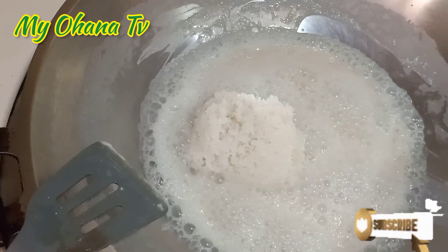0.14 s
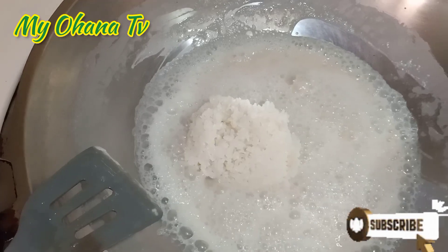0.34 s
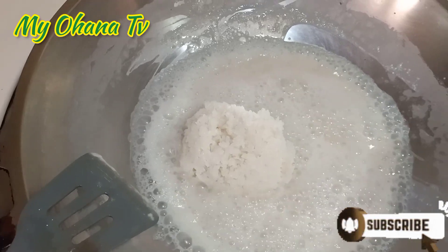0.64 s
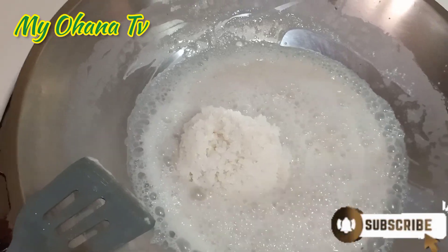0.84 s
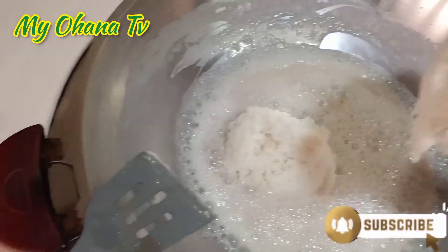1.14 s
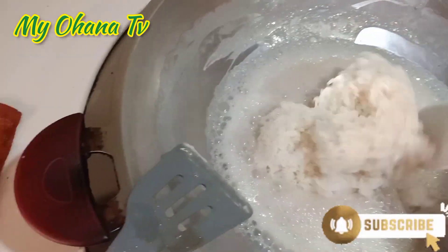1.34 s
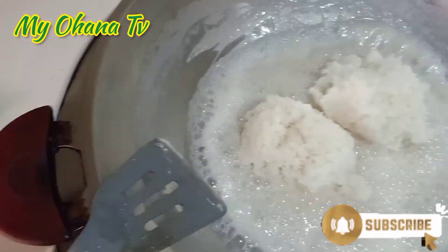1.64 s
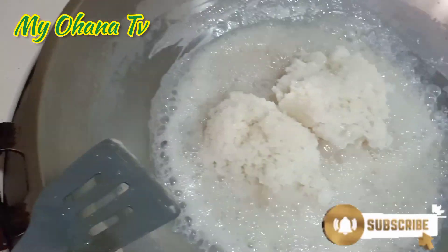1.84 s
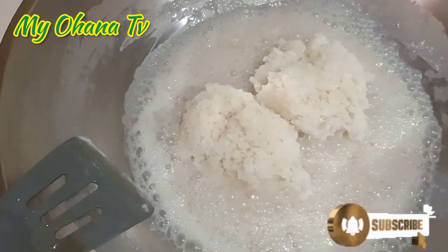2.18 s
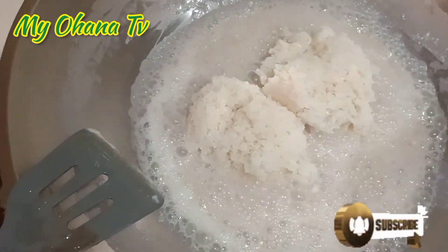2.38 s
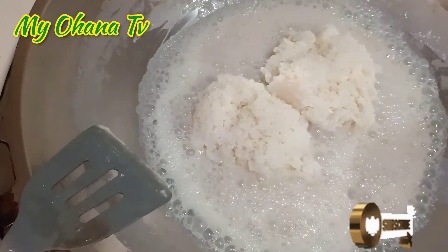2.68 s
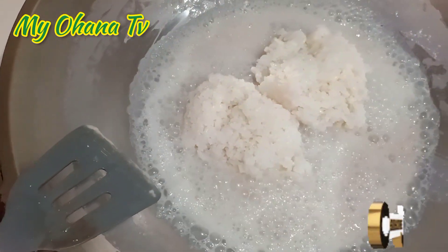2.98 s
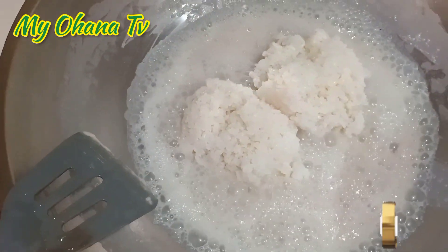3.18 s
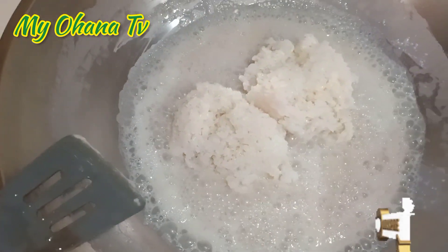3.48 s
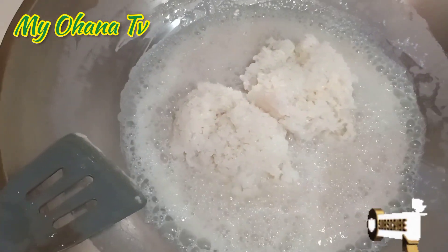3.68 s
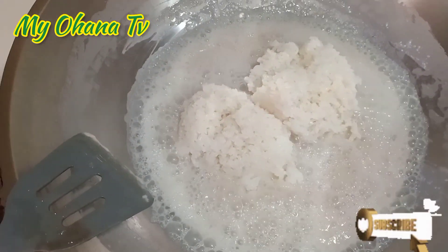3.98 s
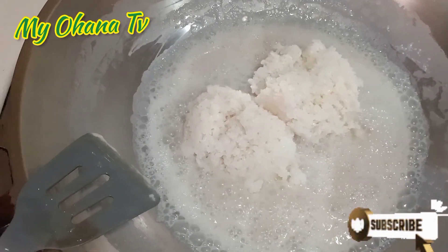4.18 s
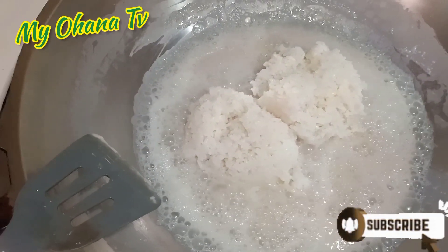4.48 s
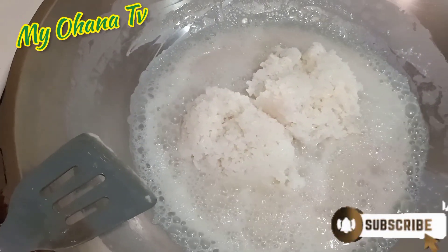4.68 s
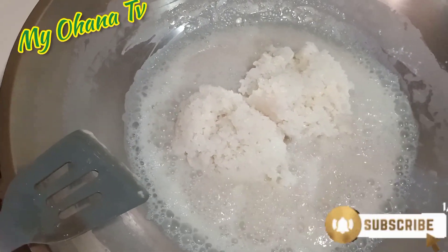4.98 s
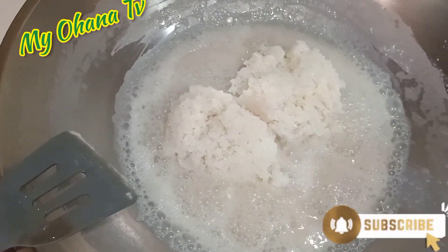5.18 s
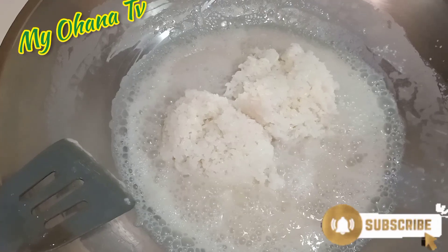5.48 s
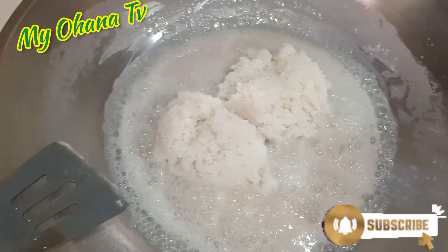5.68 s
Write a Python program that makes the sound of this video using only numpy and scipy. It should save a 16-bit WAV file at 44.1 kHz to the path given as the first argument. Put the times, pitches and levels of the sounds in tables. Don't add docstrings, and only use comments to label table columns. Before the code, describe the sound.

Thick milk boils throughout in a wide steel pan, heard close in stereo and leaning left. Dense rounded blips around 1 kHz ring in the pan's hollow, with fine hissing foam, small crackles and a low unsteady rumble. At about 0.43 s a paddle knocks hard on a full pot, a woody thud with a sharp crack and quick bounces. From 1.3 to 2.5 s rice lumps slide in: soft gritty sloshes, a sudden plop near 1.8 and fading wet washes. Another strong bouncing knock lands at 2.7 s. Around 3.25 s there is a very short scratchy scrape with ticks on the steel rim. A dull double knock comes at 4.0 s, then a light scrape and bright, quickly damped clank at 4.5 s. The small kitchen adds a short diffuse tail. Bubbles become slightly higher in pitch, while foam thins and the boil quietens towards 5.8 s.

```python
import sys
import numpy as np
from scipy import signal
from scipy.fft import rfft, irfft, next_fast_len
from scipy.io import wavfile
from scipy.ndimage import uniform_filter1d, map_coordinates

SR = 44100
rng = np.random.default_rng(int(sys.argv[2]) if len(sys.argv) > 2 else 0)


def transcribe(signal):
    frames = np.atleast_2d(signal).T
    limited = np.clip(frames, -1, 1)
    pcm = np.round(limited * 32767).astype(np.int16)
    wavfile.write(sys.argv[1], SR, pcm)


def rack_gain(trim_db):
    fader = np.asarray(trim_db, float)
    return 10 ** (fader / 20)


N = 256970
TIME_S = np.arange(N) / SR


def unit(x):
    return x / np.sqrt(np.mean(x ** 2) + 1e-20)


def along(points, hz):
    f, v = np.transpose(points)
    return np.interp(np.log(hz + 1), np.log(f + 1), v)


def over_time(rows):
    s, value = np.transpose(rows)
    return np.interp(TIME_S, s, value)


def wobble(rate):
    knots = rng.standard_normal(int(N * rate / SR) + 4)
    return map_coordinates(knots, [np.arange(N) * rate / SR])


def filtered(x, response):
    m = next_fast_len(N + SR // 2)
    return irfft(rfft(x, m) * response(np.fft.rfftfreq(m, 1 / SR)), m)[..., :N]


def resonances(peaks, direct_db):
    return lambda f: rack_gain(direct_db) + sum(
        rack_gain(db) * 1j * f * w / (c * c - f * f + 1j * f * w) for c, w, db in peaks)


def sides(pan_db):
    return rack_gain(np.multiply.outer([.5, -.5], pan_db))


def swell(peak_s, db, rise_s, t60):
    t = TIME_S - peak_s
    return rack_gain(db - 60 * np.where(t < 0, -t / rise_s, t / t60))


def place(events, shape):
    out = np.zeros((2, N + SR))
    for s, *rest in events:
        wave = shape(*rest)
        out[:, round(s * SR):][:, :wave.shape[1]] += wave
    return out[:, :N]


# frequency in Hz, left-right likeness from 0 to 1.
COHERENCE = [(60, 1), (180, 0.95), (550, 0.75), (1650, 0.4), (4970, 0.04), (15000, 0.02)]
# frequency in Hz, left-right level in dB.
BALANCE = [(60, -1.5), (150, 5), (380, 1.5), (950, 6), (2380, 11), (5980, 1.5), (15000, 1)]


def rush(spectrum, patchy_db):
    z = signal.stft(rng.standard_normal((2, N)), nperseg=512)[2]
    field = uniform_filter1d(rng.standard_normal(z.shape[1:]), 6, 0)
    field = uniform_filter1d(field, 6, 1)
    pair = signal.istft(z * rack_gain(patchy_db * unit(field)), nperseg=512)[1][:, :N]

    def mid_side(hz):
        turn = np.arccos(np.clip(along(COHERENCE, hz), -1, 1)) / 2
        return rack_gain(along(spectrum, hz)) * [np.cos(turn), np.sin(turn)]

    mid, side = filtered(pair, mid_side)
    return unit(filtered(np.array([mid + side, mid - side]), lambda hz: sides(along(BALANCE, hz))))


# frequency in Hz, density in dB per Hz.
RUMBLE_SPECTRUM = [(15, -67.5), (25, -32), (38, -27), (75, -4.5), (193, 0.5), (264, -7), (342, -5.5),
                   (377, -21), (438, -6), (583, -26), (650, -14), (840, -51), (1430, -120)]


def rumble():
    start_db, fade_db_per_s = -45, 0.37
    level_db = start_db - fade_db_per_s * TIME_S + 1.5 * wobble(21)
    return rack_gain(level_db) * rush(RUMBLE_SPECTRUM, patchy_db=3.0)


# time in seconds, level in dB.
VIGOUR = [(0, -40), (.3, -44.5), (.97, -41.5), (1.38, -42), (1.7, -40.5), (2.06, -42), (2.35, -41),
          (3.28, -40), (3.7, -43.5), (4.07, -39), (4.37, -43.5), (4.65, -41.5), (5.0, -44), (5.4, -44),
          (5.83, -47.5)]


def foam_db():
    start_db, fade_db_per_s, follows = -44, 1.24, 0.13
    vigour_db = over_time(VIGOUR)
    return start_db - fade_db_per_s * TIME_S + follows * (vigour_db - vigour_db.mean())


# frequency in Hz, density in dB per Hz.
FIZZ_SPECTRUM = [(700, -30), (1300, -8), (1750, -8), (1900, -2), (2320, -6.5), (2630, -0.5), (3060, -11),
                 (3500, -5), (4400, -13), (5450, -15), (6100, -12.5), (6750, -7), (7600, -19.5),
                 (15800, -8)]


def fizz():
    return rack_gain(foam_db() + 4.0 + .6 * wobble(9.4)) * rush(FIZZ_SPECTRUM, patchy_db=1.67)


# frequency in Hz, density in dB per Hz.
SLOSH_SPECTRUM = [(88, -59), (150, -12), (340, -11.5), (587, -13), (686, -4.5), (786, -14.5), (937, -4.5),
                  (1520, -19), (1820, -13.5), (2790, -14.5), (5000, -29), (6840, -30.5), (15800, -20)]
# peak in seconds, level in dB, rise in seconds, T60 in seconds.
RICE_SLIDES = [
    (1.429, -31.5, 0.13, 0.11),
    (1.497, -27.5, 0.24, 0.43),
    (1.792, -29, .012, 0.27),
    (1.96, -36.5, 0.95, 0.14),
    (2.128, -32.5, 0.037, 0.9),
    (2.365, -31.5, 0.087, 0.74),
]


def splashes():
    grit = rack_gain(3 * wobble(250)) * rush(SLOSH_SPECTRUM, patchy_db=2)
    return rack_gain(-3.5) * sum(swell(*row) for row in RICE_SLIDES) * grit


# start in seconds, thud in dB, crack in dB, T60 in seconds.
BLOWS = [(.431, -6.5, -14.5, 0.11), (.437, -30, -25.5, 0.08), (.455, -15.5, -23, 0.26),
         (.482, -28, -26, 0.3), (2.698, -7, -16.5, 0.15), (2.708, -10.5, -21, 0.24),
         (2.7315, -14.5, -19.5, 0.14), (2.763, -33, -29, 0.14), (4.0065, -9.5, -22.5, 0.13),
         (4.0155, -13.5, -21.5, 0.13), (4.557, -19, -19.5, 0.11), (4.537, -29, -43.5, 0.061)]
# frequency in Hz, width in Hz, level in dB.
POT_MODES = [(170, 27.6, -0.5), (232.5, 59, -10), (290.3, 37, -3.5), (359, 28.6, 1), (455, 32, 1),
             (501, 15, -15), (648, 41, -10.5), (734, 56, -11.5), (878, 99, -7)]
# frequency in Hz, width in Hz, level in dB.
PADDLE_MODES = [(1220, 120, -10), (1770, 340, -0.5), (2406, 193, 10), (3570, 470, -13.5), (6490, 700, -5)]


def knocks():
    t = np.arange(SR // 3) / SR

    def rattle(t60, apart):
        shared = rng.standard_normal(len(t))
        return rack_gain(-60 * t / t60) * (shared + apart * rng.standard_normal((2, len(t))))

    push = -3 * np.exp(-((t - .0006) / 0.000077) ** 2)
    delay_s = np.array([[0], [.00012]])
    tap = np.exp(-((t - .0004 - delay_s) / .00004) ** 2)

    def thud(db, crack_db, t60):
        return rack_gain(db + 1.0) * (push + rattle(t60, apart=0.99))

    def crack(db, crack_db, t60):
        short = rattle(0.026, apart=3.92)
        return rack_gain(crack_db + 4.5) * (4 * tap + short + rack_gain(-17) * rattle(t60, apart=4.0))

    def dull(hz):
        band = (1j * hz / (105 + 1j * hz)) ** 3 / (1 + 1j * hz / 900) ** 2
        return resonances(POT_MODES, direct_db=-20)(hz) * band

    def sharp(hz):
        band = 1j * hz / (900 + 1j * hz) / (1 + 1j * hz / 4000)
        return resonances(PADDLE_MODES, direct_db=-28)(hz) * band

    pot = rack_gain(11.5) * sides(3.7)[:, None] * filtered(place(BLOWS, thud), dull)
    return pot + rack_gain(-6) * sides(0.64)[:, None] * filtered(place(BLOWS, crack), sharp)


def snaps():
    t = np.arange(SR // 10) / SR

    def snap(db, crack_db, t60):
        level_db = -45 + 3.2 * (crack_db + 15) - 60 * t / 0.036
        return rack_gain(level_db) * rng.standard_normal((2, len(t)))

    burst = place(BLOWS, snap) * sides(-5.5)[:, None]
    return filtered(burst, lambda hz: 1 / (1 + (8200 / (hz + 1)) ** 12))


# frequency in Hz, level in dB, T60 in seconds, left-right in dB.
STRUCK_MODES = [(872, -8, 0.08, 8), (1599, -7, 0.1, 7), (1817, -10.5, 0.073, 10.5), (2460, -7, 0.039, 15),
                (2764, 7.5, 0.03, 14.5), (2800, -34, 0.18, 12), (2800, -33, 0.14, 8), (3120, -9, 0.014, 8),
                (3340, -8, 0.045, 18.5), (4100, -8.5, 0.03, 3), (4907, -11.5, .04, -4),
                (5100, -34, 0.24, -4), (6380, -10, 0.032, 9.5), (6920, -13.5, 0.044, 0)]


def ring(t):
    out = 0
    for hz, db, t60, pan_db in STRUCK_MODES:
        level = rack_gain(db + rng.normal(0, 0.94) - 60 * t / t60) * sides(pan_db)[:, None]
        out = out + level * np.sin(2 * np.pi * hz * t + rng.normal(0, 0.47, (2, 1)))
    return out * (1 - np.exp(-t / 0.0022))


# start in seconds, peak in dB.
RIM_CLANKS = [
    (4.5075, -39.5),
    (4.525, -42),
    (4.5553, -15),
    (4.5585, -22.5),
]
# peak in seconds, level in dB, rise in seconds, T60 in seconds, brightness in dB.
RIM_SCRAPES = [
    (3.232, -48, 0.025, .06, -37),
    (3.263, -28.5, .012, 0.13, -16),
    (3.279, -21, 0.037, .07, -25),
    (4.508, -32, 0.027, 0.23, -20.5),
    (4.542, -43, 0.17, 0.022, -21),
]
# start in seconds, peak in dB, left-right in dB.
RIM_TICKS = [
    (3.2275, -31.5, -3),
    (3.2615, -41, 8),
    (3.269, -27.5, -3.5),
    (3.2755, -24, 7),
    (4.507, -36.5, -5),
]
# frequency in Hz, width in Hz, level in dB.
RUBBED_MODES = [(2578, 230, 2.5), (2790, 51, 2), (3700, 340, -12), (4070, 130, -2), (4532, 116, -2.5),
                (5027, 260, -19), (5800, 300, -22), (6770, 840, -2)]


def rim():
    t = np.arange(SR // 3) / SR
    drag, air = np.zeros(N), np.zeros(N)
    for *stroke, bright_db in RIM_SCRAPES:
        drag += swell(*stroke)
        air += rack_gain(bright_db) * swell(*stroke)
    grit = rng.standard_normal((2, N)) * rack_gain(5.2 * wobble(300))

    def tick(db, pan_db):
        return rack_gain(db - 60 * t / 0.043) * sides(pan_db)[:, None] * rng.standard_normal((2, len(t)))

    contact = rack_gain(1) * drag * grit + rack_gain(13.5) * place(RIM_TICKS, tick)
    steel = filtered(contact, resonances(RUBBED_MODES, direct_db=-24.0))
    hiss = rack_gain(-12.5) * air * grit * sides(-12.5)[:, None]
    hiss = filtered(hiss, lambda hz: 1 / (1 + (8500 / (hz + 1)) ** 12))
    clank = place(RIM_CLANKS, lambda db: rack_gain(db) * ring(t))
    return steel + clank, hiss


def bursts(s, db, hz, pan_db, lag, cycles, rise, size):
    step = np.arange(size)
    out = np.zeros((2, N))
    for ear, sign in enumerate((.5, -.5)):
        turns = np.clip(step - 6 - sign * lag[:, None], 0, None) * hz[:, None] / SR
        wave = np.sin(2 * np.pi * turns * (1 + rise * turns))
        wave = wave * np.exp(-turns / cycles) * (1 - np.exp(-1.5 * turns))
        wave = wave * rack_gain(db + sign * pan_db)[:, None]
        at = (s * SR).astype(int)[:, None] + step
        out[ear] = np.bincount(at.ravel(), wave.ravel(), N + SR)[:N]
    return out


def swarm(count, size, hz, spread, size_db, clump, cycles):
    u = rng.random((count, 2))
    g = rng.standard_normal((count, 3))
    chance = np.cumsum(np.exp(clump * wobble(14)))
    at = np.searchsorted(chance, u[:, 0] * chance[-1])
    pitch_hz = hz[at] * np.exp(spread * g[:, 0])
    pan_db = along(BALANCE, pitch_hz) + 3 * g[:, 1]
    level_db = -size_db * np.log(u[:, 1] + 1 / 50)
    return unit(bursts(at / SR, level_db, pitch_hz, pan_db, 6 * g[:, 2], cycles, rise=0.038, size=size))


# start in seconds, peak in dB, pitch in Hz, left-right in dB.
BIG_BUBBLES = [(.2122, -24.5, 913, 9), (0.9122, -25, 1113, 7), (1.6709, -27, 1010, -1),
               (1.789, -21.5, 1240, 2), (1.9447, -27, 1220, 6), (2.0555, -26.5, 913, 8),
               (2.1315, -19, 983, 2), (2.3596, -28, 737, 19), (2.382, -23, 1060, 0), (2.5306, -30, 1030, 5),
               (2.8, -26, 911, 9), (2.8227, -25.5, 1090, 0), (2.86, -23, 1160, 5), (3.0056, -25.5, 830, 2),
               (3.0772, -25, 1023, 6), (3.1195, -30, 1178, 5), (3.407, -24.5, 915, 7),
               (3.842, -26, 1135, 6), (3.9069, -25.5, 1020, 1), (3.943, -28.5, 1260, 5),
               (4.2665, -24.5, 1115, 6), (4.681, -23, 845, 6), (4.7412, -24.5, 1170, 5),
               (4.9265, -23.5, 1240, 5), (5.0194, -26, 1220, 2), (5.116, -26.5, 956, 7),
               (5.278, -25, 1079, 5), (5.4427, -24, 1200, 7), (5.5236, -29, 946, 8),
               (5.6405, -25.5, 960, 6)]


def twins():
    g = rng.standard_normal((len(BIG_BUBBLES), 4))
    s, db, hz, pan_db = np.transpose(BIG_BUBBLES)
    gap_s = .008 * np.exp(.25 * g[:, 0])
    pitch_hz = 0.923 * hz * np.exp(0.088 * g[:, 2])
    return np.transpose([s + gap_s, db - 7 + 2.3 * g[:, 1], pitch_hz, pan_db + 2.5 * g[:, 3]])


def middling(vigour_db, shift, count):
    lull_s, lull_db = .035, -14
    u, g = rng.random((count, 2)), rng.standard_normal((count, 2))
    starts = np.transpose(BIG_BUBBLES)[0]
    wait_s = starts[np.searchsorted(starts, TIME_S).clip(0, len(starts) - 1)] - TIME_S
    lively = rack_gain(vigour_db + lull_db * (np.abs(wait_s) < lull_s))
    chance = np.cumsum(lively * np.exp(.7 * wobble(12)))
    at = np.searchsorted(chance, (np.arange(count) + u[:, 0]) / count * chance[-1]).clip(0, N - 1)
    hz = 1060 * 2 ** shift[at] * np.exp(0.12 * g[:, 0])
    return np.transpose([at / SR, -31 + 7 * (u[:, 1] - .5), hz, 3.5 - 1.5 * g[:, 1]])


# time in seconds, pitch shift in octaves.
PITCH_SHIFT = [(0, -0.16), (1.3, -0.12), (2.5, -0.026), (3.5, 0.0037), (3.9, 0.18), (5.83, 0.23)]
# frequency in Hz, width in Hz, level in dB.
HOLLOW_MODES = [(680, 15, -10), (768.5, 61, 1), (937.4, 60, 4.5), (1090, 15, -18), (1240, 170, -1),
                (1478, 160, -8), (2685, 130, -2.5)]


def bubbles():
    vigour_db, shift = over_time(VIGOUR), over_time(PITCH_SHIFT)
    higher = 2 ** shift
    rows = np.vstack([BIG_BUBBLES, twins(), middling(vigour_db, shift, count=95)])
    s, db, hz, pan_db = np.transpose(rows)
    lag = 6 * rng.standard_normal(len(s))
    big = bursts(s, db + 7, hz, pan_db, lag, cycles=1.08, rise=0.0048, size=448)
    big = filtered(big, resonances(HOLLOW_MODES, direct_db=-3.5))
    skin = bursts(s, db - 2.5, 2.4 * hz, pan_db + 9.5, lag, cycles=1.0, rise=0.017, size=96)
    small = swarm(count=3300, size=256, hz=950 * higher, spread=0.29, size_db=1.7, clump=.35, cycles=2.8)
    small = unit(filtered(small, resonances(HOLLOW_MODES, direct_db=-1.5)))
    crackle = swarm(count=2400, size=96, hz=2300 * higher, spread=0.33, size_db=7.0, clump=.6, cycles=0.85)
    hollow = resonances(HOLLOW_MODES, direct_db=-30)
    hum = rng.standard_normal(N) + 0.76 * rng.standard_normal((2, N))
    hum = unit(filtered(hum, lambda hz: hollow(hz) ** 2 * sides(along(BALANCE, hz))))
    steady = rack_gain(vigour_db - 0.5) * small + rack_gain(vigour_db - 7.5 - 16 * shift) * hum
    return big + skin + steady + rack_gain(foam_db() - 4.5) * crackle


# frequency in Hz, T60 in seconds.
ROOM_DECAY = [(150, 0.37), (1000, 0.45), (4000, 0.44), (10000, 0.6)]


def kitchen(x):
    hz, t, z = signal.stft(rng.standard_normal((2, SR // 2)), SR, nperseg=256)
    decay = rack_gain(-60 * t / along(ROOM_DECAY, hz)[:, None])
    tail = signal.istft(z * decay, SR, nperseg=256)[1]
    late = np.pad(x.mean(0), (200, 0))[None]
    return signal.fftconvolve(late, tail / np.linalg.norm(tail[0]), axes=1)[:, :N]


# frequency in Hz, gain in dB.
PORT_RESPONSE = [(7650, 0), (7800, -25)]
# frequency in Hz, gain in dB.
TREBLE_RESPONSE = [(7900, 0), (8350, 17), (8750, 5), (9300, 4.5), (10500, -3.5), (12000, -15.5),
                   (14500, -9)]


def scene():
    bed = rumble() + fizz() + splashes()
    pot = knocks()
    steel, hiss = rim()
    pops = bubbles()
    room = kitchen(rack_gain(-11.0) * pops + rack_gain(-14) * pot + rack_gain(-9) * steel)
    heard = pops + pot + steel + room + bed
    heard = filtered(heard, lambda hz: rack_gain(along(PORT_RESPONSE, hz) + along(TREBLE_RESPONSE, hz)))
    return heard + hiss + snaps()


def roll_off(x):
    return signal.sosfilt(signal.butter(12, 15300, fs=SR, output="sos"), x)


def record(dry):
    return roll_off(dry)


dry = scene()
out = record(dry)
transcribe(out)
```